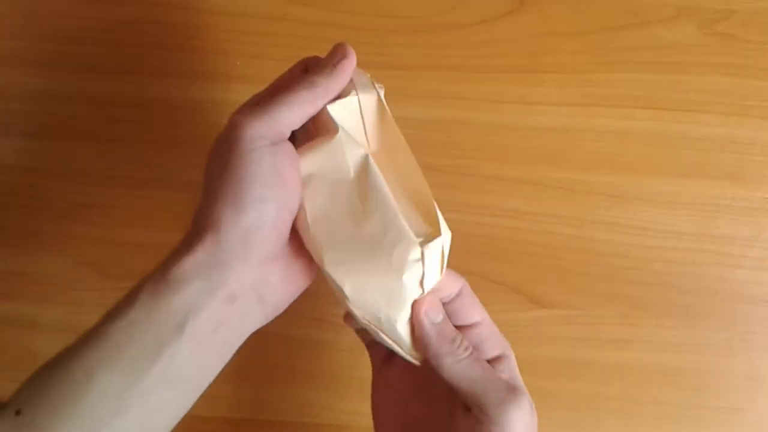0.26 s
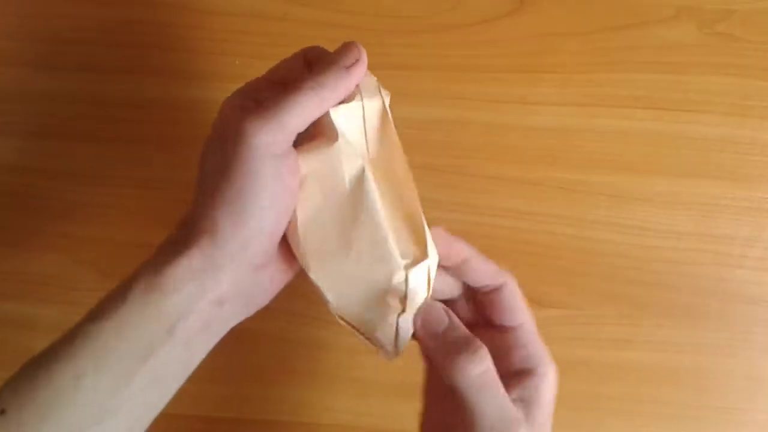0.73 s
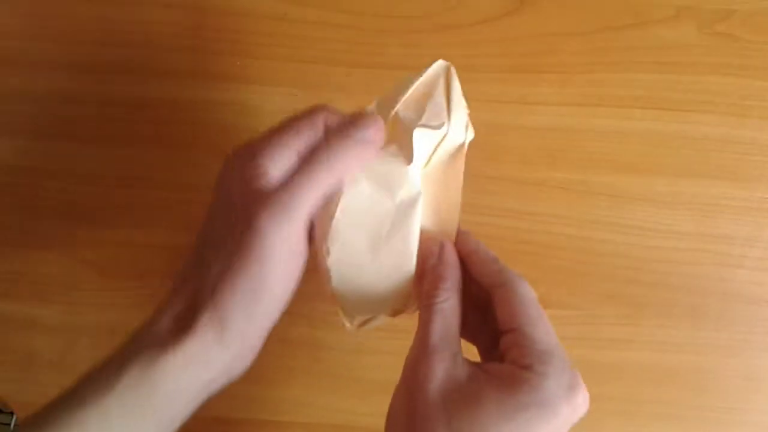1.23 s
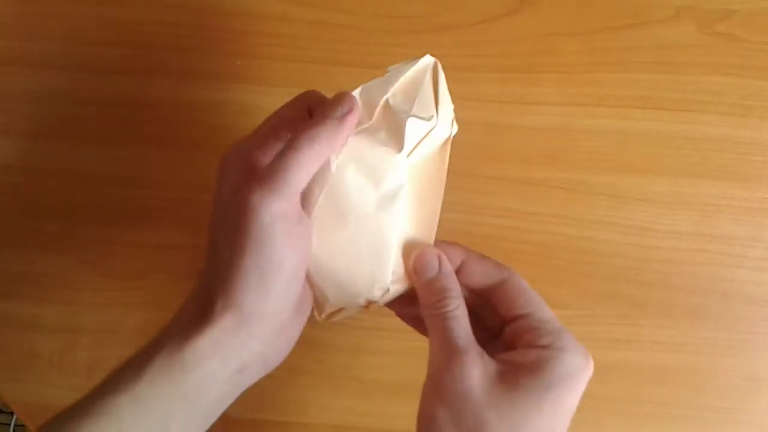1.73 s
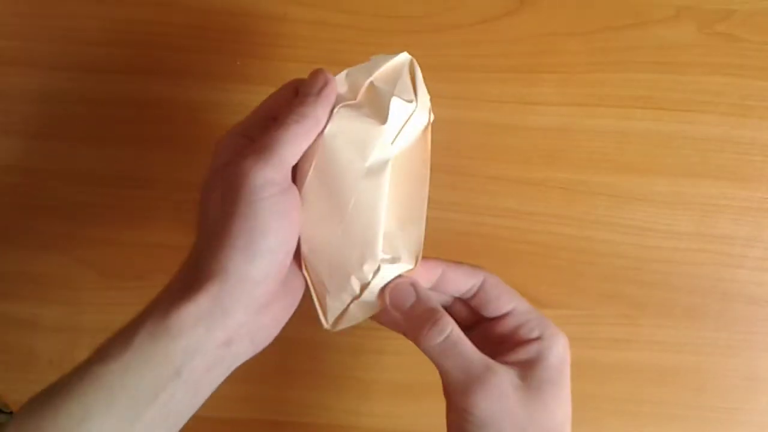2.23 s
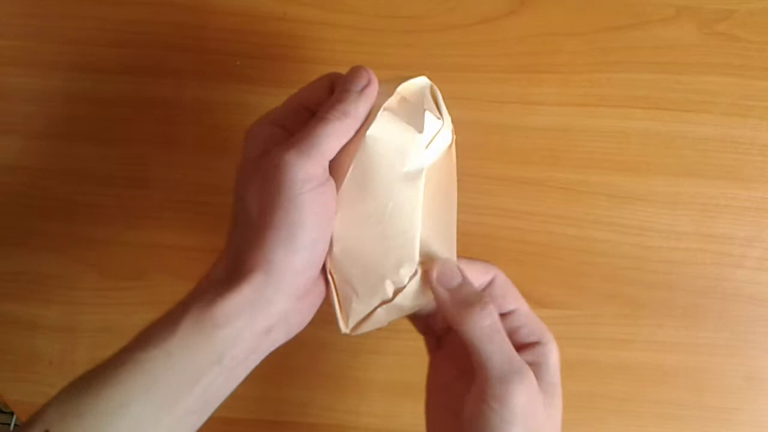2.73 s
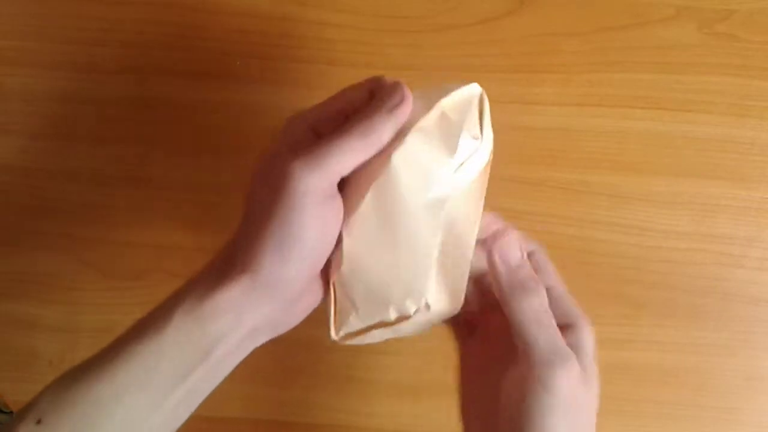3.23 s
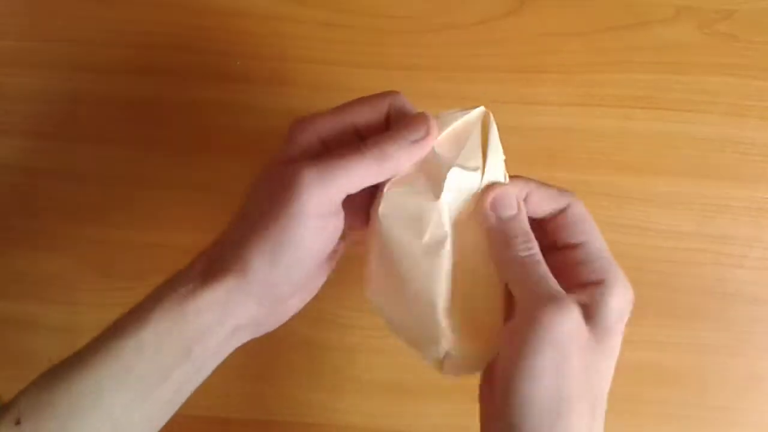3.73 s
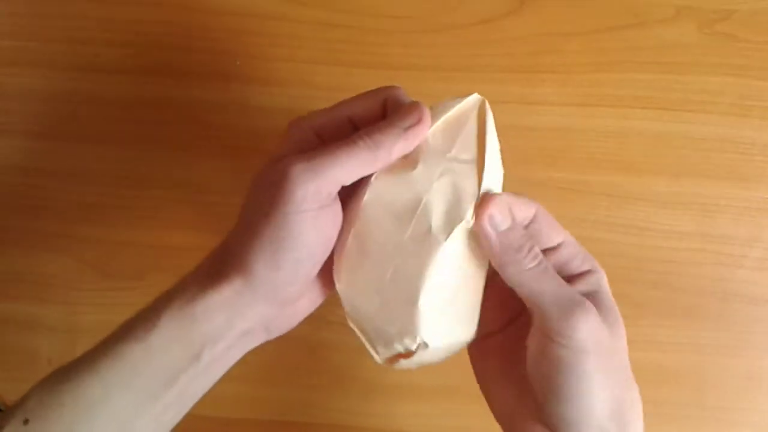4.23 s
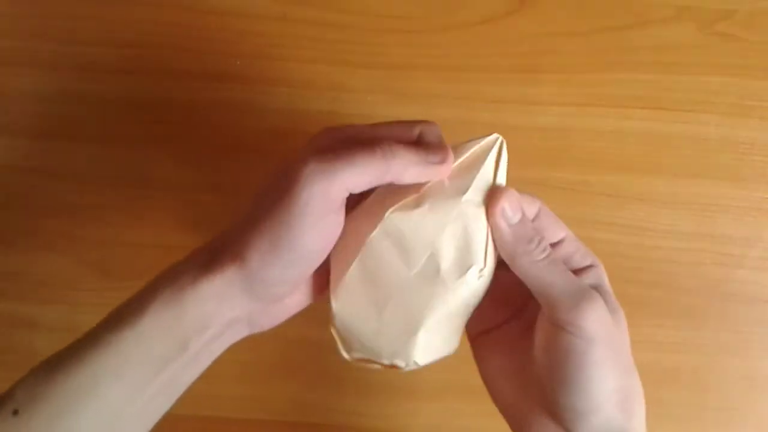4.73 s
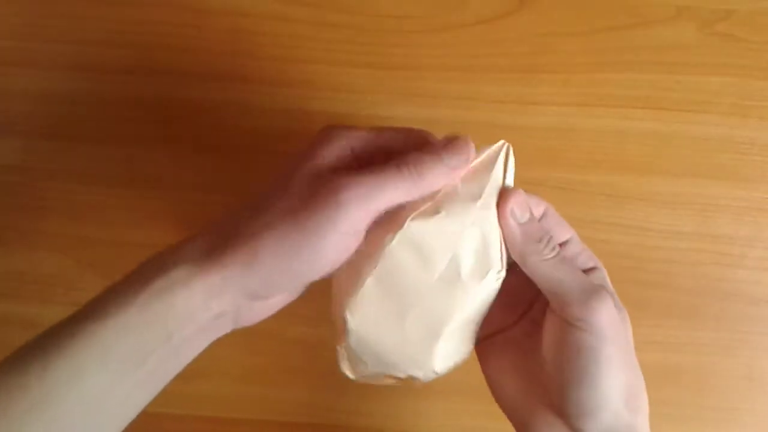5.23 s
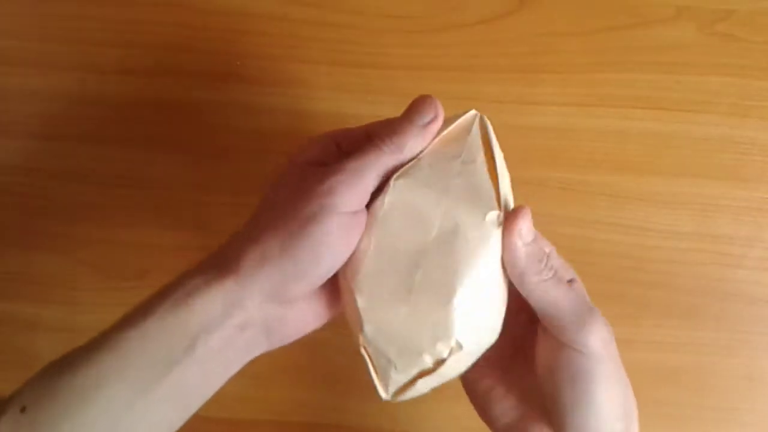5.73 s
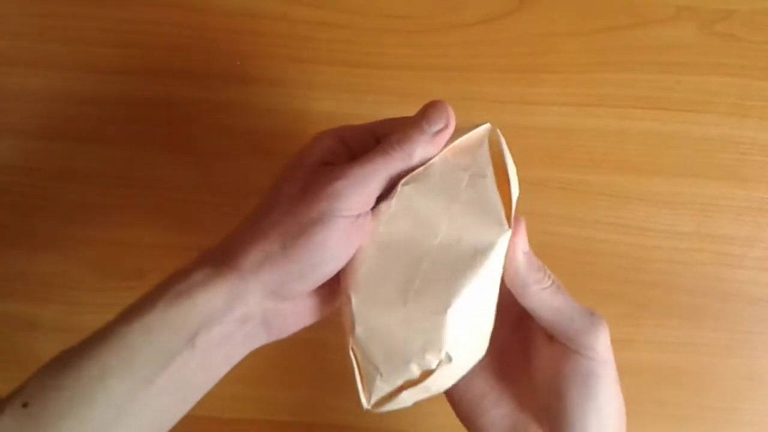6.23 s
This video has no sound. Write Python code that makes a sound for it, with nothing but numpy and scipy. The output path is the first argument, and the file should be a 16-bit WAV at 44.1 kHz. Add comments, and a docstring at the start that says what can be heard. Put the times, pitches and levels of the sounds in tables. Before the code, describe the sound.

Stiff paper crinkles and snaps unevenly between fingers, with soft scratchy rubbing between flurries and two loud pops near the end, close up indoors.

```python
"""Two hands press open a folded paper pouch above a wooden desk in a small quiet room with a mains hum.
From the start, creases buckle with sharp snaps that briefly ring the hollow pouch, a loose flap and a facet;
between them fingers rub as stick-slip friction noise, and small wrinkles tick as the grip shifts.
After 4.1 s the pouch is open and the flap rings higher; a loud snap near 6.0 s and another near 6.4 s,
followed by a last rub, end the scene. Filtered noise makes cracks, rubs and air; decaying sines make rings."""
import sys
import numpy as np
from scipy import signal
from scipy.fft import rfft, irfft
from scipy.io import wavfile

SR = 44100
rng = np.random.default_rng(int(sys.argv[2]) if len(sys.argv) > 2 else 0)


def master_out(mix):
    """Clip the mix to full scale and print it as 16-bit PCM to the path in sys.argv[1]."""
    frames = np.transpose(np.atleast_2d(mix))
    ceiling = np.clip(frames, -1, 1)
    pcm = np.round(ceiling * 32767).astype(np.int16)
    wavfile.write(sys.argv[1], SR, pcm)


N = 285768
TIME = np.arange(N) / SR
SHORT_TIME = np.arange(4096) / SR  # time axis of one crack or ring
HALF_SECOND = TIME[:SR // 2]

# Spectrum of the still room, relative density: frequency_hz, density_db
AIR_SPECTRUM = [(25, -13), (54, -7), (90, -4.5), (125, -3), (165, -2), (260, -3.5), (450, -8.5), (800, -13),
                (1400, -16), (2500, -44), (5000, -27), (8000, -24.5), (15000, -24.5)]
# Spectrum of paper sliding on skin and on itself, relative: frequency_hz, gain_db
FRICTION_SPECTRUM = [(180, -21.5), (330, 3), (560, -7.5), (800, -5), (1060, -5), (1500, -6.5), (2000, 1),
                     (2900, -4.5), (4300, -1.5), (5500, -5.5), (7500, -13), (10500, -17.5), (15000, -21)]
# Effort of the shifting grip, the base level of its rustle: time_s, effort_db
GRIP_EFFORT = [(0.0, -66), (0.78, -66.5), (1.37, -62.5), (1.51, -57.5), (1.97, -69), (2.04, -62.5),
               (2.38, -58.5), (3.27, -64), (3.52, -64), (3.61, -61.5), (4.58, -62), (5.02, -65.5),
               (5.32, -65.5), (5.67, -58), (5.79, -64), (6.1, -56.5), (6.39, -66), (6.48, -64)]
# Clear strokes of a finger or a sliding layer: middle_s, swell_width_s, level_db
RUB_STROKES = [(0.024, 0.019, -42), (0.254, 0.026, -57.5), (0.624, .022, -51), (0.718, .018, -52.5),
               (1.059, 0.029, -46), (1.132, 0.02, -44.5), (1.523, 0.059, -53), (1.706, 0.029, -50),
               (1.961, 0.026, -46.5), (2.15, .07, -56), (2.307, 0.023, -54), (2.428, 0.016, -45.5),
               (3.162, 0.021, -53.5), (3.528, 0.023, -50.5), (3.683, 0.022, -53), (4.569, 0.016, -43.5),
               (4.801, 0.021, -53), (5.572, 0.032, -45), (6.259, 0.03, -46.5), (6.453, .032, -39)]
# Wrinkles that stand out in the lulls: start_s, level_db
CLEAR_TICKS = [(3.144, -53.5), (3.225, -51.5), (3.266, -51.5), (3.677, -50), (3.995, -54.5), (4.295, -54.5),
               (4.714, -49), (4.728, -52), (4.922, -54.5), (5.213, -51.5), (5.316, -50), (5.344, -50)]
# Radiation of the cracking sheet, relative: frequency_hz, gain_db
SHEET_SPECTRUM = [(150.0, -33), (300.0, -1.5), (500.0, -2.5), (800.0, -4.5), (1400.0, -4), (1900.0, 4.5),
                  (2800.0, -1), (4000.0, 1.5), (5200.0, -2), (6500.0, -12), (8500.0, -20), (11000.0, -28.5),
                  (15000.0, -38)]
# Creases snapping through: start_s, crack_db, tilt_db_per_octave, pouch_hz, pouch_db, flap_db, facet_hz
CREASE_SNAPS = [(0.125, -49.5, 5, 390, -58, -63, 1910), (0.3083, -34, 2, 340, -43.5, -55, 1904),
                (0.3232, -34.5, 3.5, 410, -44.5, -64, 1525), (0.328, -33.5, 0.5, 310, -47.5, -58, 1890),
                (0.587, -39.5, -4, 354, -48, -66, 1850), (0.6551, -42, -5, 416, -35, -57, 690),
                (0.69, -48, 5.5, 400, -59, -67, 3940), (.9751, -44, -2, 334, -57, -55.5, 1850),
                (1.3228, -41, 0.5, 325, -58, -51, 2170), (1.375, -42, -4, 485, -47, -55, 2290),
                (1.3806, -29.5, -0.7, 684, -60, -39, 2280), (1.4005, -19, 3.5, 434, -31, -33, 2300),
                (1.587, -60, -10, 443, -53, -71, 640), (1.8405, -31.5, -1, 420, -37, -37, 800),
                (1.9053, -32.5, -1, 684, -59, -46, 1860), (1.9468, -34, 3.5, 367, -62, -54, 2130),
                (2.1136, -49.5, 2, 467, -52.5, -60, 1830), (2.352, -31.5, 2, 694, -48, -39.5, 2120),
                (2.43, -41.5, 3, 370, -45.5, -52, 1950), (2.5165, -46.5, -2, 357, -64, -60, 2200),
                (2.5557, -45.5, -0.5, 328, -51, -48, 1090), (2.71, -42.5, -0.5, 590, -56, -53, 2000),
                (2.7909, -34.5, -2.5, 536, -40, -60, 2220), (2.8722, -35.5, -5, 447, -33, -52, 784),
                (2.9442, -22, 3.5, 490, -33, -33, 3750), (2.9596, -32, 3.5, 494, -36, -58, 5100),
                (3.3842, -47.5, 0.5, 413, -52.5, -58, 2690), (3.462, -43.5, 1, 380, -55.5, -52.5, 4110),
                (3.757, -47.5, -6.5, 710, -52, -58, 1890), (3.78, -34.5, -2.5, 715, -62, -44.5, 1890),
                (3.8314, -33.5, -6, 515, -30, -31.5, 945), (3.95, -54.5, -7.5, 370, -47.5, -61, 784),
                (4.0777, -49, 2.5, 470, -48.5, -67, 3500), (4.1229, -47.5, 3, 450, -57, -64, 2330),
                (4.226, -40.5, 0.5, 514, -52, -62, 2570), (4.39, -30, -1, 358, -38.5, -38.5, 2400),
                (4.4098, -36, -3, 340, -60, -52, 764), (4.559, -46, 0, 370, -49, -52, 2380),
                (4.609, -43, -2.2, 377, -54, -58, 1820), (5.4497, -31.5, -4.5, 309, -33, -56, 1995),
                (5.4943, -36.5, 5, 524, -49.5, -47, 2000), (5.562, -38, 2.5, 580, -63, -47, 1830),
                (5.584, -45, -4, 587, -49, -49, 2200), (5.607, -56, -8, 368, -50.5, -64, 694),
                (5.7119, -39.5, -6.5, 343, -33.5, -53, 2190), (5.7758, -40.5, -7, 440, -49, -58, 935),
                (5.7931, -32.5, 0, 490, -43, -42, 4200), (5.8135, -39, -8, 376, -41.5, -62, 1810),
                (5.844, -33.5, -2.5, 259, -45, -60, 2290), (5.8626, -48.5, -10, 530, -47, -60, 740),
                (5.958, -46.5, -9, 520, -43.5, -66, 740), (5.998, -18.5, 2, 260, -35, -40, 4070),
                (6.1517, -60, -5, 396, -48.5, -68, 2100), (6.1734, -36, -3.5, 302, -45, -38, 1855),
                (6.2693, -35, -2.5, 743, -43.5, -56, 1930), (6.408, -18, 3, 744, -33.5, -41, 1860)]

AIR_DB, HUM_DB, MAINS_HZ = -60, -68, 120
WRINKLES_PER_S, WRINKLE_SPREAD_DB = 22, 3.5  # faint wrinkles: mean rate, spread either side of the grip effort
FLAP_LOOSE_HZ, FLAP_TAUT_HZ, OPENS_S = 1024, 1435, 4.1  # an opened pouch pulls the flap taut
FLAP_SPREAD = 0.079  # share by which the flap's pitch differs from fold to fold
FACET_DB = -4  # facet ring relative to an untilted crack
RING_PER_TILT = 0.22  # facet dB gained per dB per octave of dullness: a slow buckle moves the whole facet
TOP_HZ = 15000


def undb(db):
    """Amplitude gain is ten to the power of decibels over twenty."""
    return 10 ** (np.asarray(db) / 20)


def level(x, db):
    """The root mean square sets the level of a sustained sound."""
    return x * undb(db) / np.sqrt(np.mean(x ** 2))


def burst_level(x, db):
    """The level of a short sound is its total energy spread over 10 ms."""
    return x * undb(db) / np.sqrt(np.sum(x ** 2) / (SR / 100))


def add(out, x, start_s):
    """Superposition: sounds add sample by sample from their start onwards."""
    i = int(np.clip(start_s * SR, 0, N - 1))
    out[i:i + len(x)] += x[:N - i]


def fade(t, t60):
    """Exponential decay falls by 60 dB in t60 seconds."""
    return np.exp(-np.log(1000) * t / t60)


def low_pass(x, order, hz):
    """A Butterworth filter attenuates components above its corner frequency."""
    return signal.sosfilt(signal.butter(order, hz, fs=SR, output="sos"), x)


def high_pass(x, order, hz):
    """A Butterworth filter attenuates components below its corner frequency."""
    return signal.sosfilt(signal.butter(order, hz, "high", fs=SR, output="sos"), x)


def colour(x, points, tilt_db=0, size=4096):
    """A minimum-phase filter realises a magnitude curve causally; the tilt is in dB per octave."""
    hz, db = np.transpose(points)
    f = np.maximum(np.arange(size // 2 + 1) * SR / size, 1)
    # the tilt pivots at 3000 Hz and levels off below 450 Hz
    tilt = tilt_db * np.log2(np.maximum(f, 450) / 3000)
    gain_db = np.interp(np.log(f), np.log(hz), db) + tilt
    # folding the cepstrum onto positive times gives minimum phase
    cepstrum = irfft(np.log(undb(gain_db)))
    cepstrum[1:size // 2] *= 2
    cepstrum[size // 2 + 1:] = 0
    impulse_response = irfft(np.exp(rfft(cepstrum)))
    return signal.fftconvolve(x, impulse_response)[:len(x)]


def walk(hz):
    """Low-passed noise is a slow random drift; its spread is 1."""
    return level(low_pass(rng.standard_normal(N), 2, hz), 0)


def still_air(waver=0.2, waver_hz=6):
    """Ambient noise is a steady coloured hiss and rumble; the mains adds a slightly wavering sine hum."""
    air = level(colour(rng.standard_normal(N), AIR_SPECTRUM), AIR_DB)
    hum = (1 + waver * walk(waver_hz)) * np.sin(2 * np.pi * MAINS_HZ * TIME)
    return air + level(hum, HUM_DB)


def room(x, wet_db=-10.0, t60=0.18, treble_t60=0.15, split_hz=6000, build_s=0.0035, bass_db=2):
    """Reverberation of a small furnished room builds up quickly and decays faster in the treble."""
    t = HALF_SECOND
    low = low_pass(rng.standard_normal(len(t)), 2, split_hz)
    high = high_pass(rng.standard_normal(len(t)), 2, split_hz)
    build_up = 1 - np.exp(-(t / build_s) ** 2)
    tail = (low * fade(t, t60) + high * fade(t, treble_t60)) * build_up
    unit_energy_tail = tail / np.sqrt(np.sum(tail ** 2))
    echoes = colour(unit_energy_tail, [(700, bass_db), (2500, 0)])
    return undb(wet_db) * signal.fftconvolve(x, echoes)[:N]


def folded(points, ripple_db):
    """Each shape of the fold superposes its own treble peaks and gaps on the paper's spectrum."""
    hz = np.geomspace(150, 15000, 72)
    # the ripple reaches its full spread at 2000 Hz
    ripple = ripple_db * rng.standard_normal(len(hz)) * np.clip(hz / 2000, 0, 1)
    known_hz, db = np.transpose(points)
    smooth_db = np.interp(np.log(hz), np.log(known_hz), db)
    return np.column_stack([hz, smooth_db + ripple])


def friction(samples, catches_per_s=900, scatter_db=5.0, slide=0.93):
    """Stick-slip: fibres catch and let go in dense tiny ticks above a steady slide; rms 1."""
    sizes = undb(scatter_db * np.minimum(rng.exponential(size=samples), 4.5))
    catches = (rng.random(samples) < catches_per_s / SR) * sizes
    tick_decay = fade(SHORT_TIME, 0.012)
    energy = np.abs(signal.fftconvolve(catches ** 2, tick_decay ** 2)[:samples])
    grain = np.sqrt(energy / energy.mean() + slide)
    noise = grain * rng.standard_normal(samples)
    return level(colour(noise, folded(FRICTION_SPECTRUM, 2.8)), 0)


def effort_db(s):
    """The grip's effort on the paper varies continuously between tabulated times."""
    return np.interp(s, *np.transpose(GRIP_EFFORT))


def rubs(grip_db=-2.0, pressure_db=2.0, pressure_hz=16):
    """Sliding friction: strokes swell and die over a grip that keeps shifting to a new fold."""
    strokes, grip = np.zeros((2, N))
    t = HALF_SECOND
    for middle_s, width_s, db in RUB_STROKES:
        start_s = max(middle_s - t[-1] / 2, 0)
        swell = np.exp(-((t + start_s - middle_s) / width_s) ** 2)
        add(strokes, undb(db) * swell * friction(len(t)), start_s)
    # overlapping half-sine windows pass from one fold to the next
    for start_s in np.arange(0, N / SR, t[-1] / 2):
        add(grip, np.sin(np.pi * t / t[-1]) * friction(len(t)), start_s)
    # the fingers never press evenly
    uneven_db = pressure_db * walk(pressure_hz)
    return strokes + grip * undb(effort_db(TIME) + grip_db + uneven_db)


def ticks(tilt_db=-2.5):
    """Wrinkles too small to shake the pouch only crack; faint ones fall at random and follow the grip."""
    out = np.zeros(N)
    when, size = rng.random((int(WRINKLES_PER_S * N / SR), 2)).T
    times = when * N / SR
    faint_db = effort_db(times) + WRINKLE_SPREAD_DB * (2 * size - 1)
    for start_s, db in [*CLEAR_TICKS, *zip(times, faint_db)]:
        add(out, burst_level(crack(tilt_db, hold_s=0.006), db), start_s)
    return out


def crack(tilt_db, hold_s=0.0043, flutter_db=-23, flutter_t60=0.11, edge_hz=14000, db_per_octave=3.5):
    """Bending waves run to and fro in the sheet: an abrupt dense burst, then a weak flutter."""
    burst = fade(np.maximum(SHORT_TIME - hold_s, 0), 0.028)
    envelope = burst + undb(flutter_db) * fade(SHORT_TIME, flutter_t60)
    waves = rfft(rng.standard_normal(len(SHORT_TIME)) * envelope)
    # sudden buckling excites all frequencies about equally; a second, gentler envelope shapes the result
    even = irfft(waves / np.abs(waves)) * np.sqrt(envelope)
    # a dull, slow buckle also loses its sharp edge
    edge = np.clip(edge_hz * 2 ** (tilt_db / db_per_octave), 3500, 19000)
    return colour(low_pass(even, 3, edge), folded(SHEET_SPECTRUM, 4), tilt_db)


def ring(hz, swell_s=0.002, shorten=0.08, rough=0.41):
    """A damped paper panel swells within milliseconds and dies at once; high panels are quicker."""
    tau = swell_s * (1000 / hz) ** shorten  # swell_s holds for a 1000 Hz panel
    # the panel is still changing shape, so its pitch is unsteady
    wander = rough * np.cumsum(rng.standard_normal(len(SHORT_TIME))) / np.sqrt(tau * SR)
    phase = 2 * np.pi * (hz * SHORT_TIME + rng.random()) + wander
    return SHORT_TIME * np.exp(-SHORT_TIME / tau) * np.sin(phase)


def snaps():
    """Snap-through buckling cracks each crease and excites pouch, flap and facet; returns both sounds."""
    cracks, rings = np.zeros((2, N))
    for start_s, crack_db, tilt_db, pouch_hz, pouch_db, flap_db, facet_hz in CREASE_SNAPS:
        add(cracks, burst_level(crack(tilt_db), crack_db), start_s)
        flap_base_hz = FLAP_LOOSE_HZ if start_s < OPENS_S else FLAP_TAUT_HZ
        flap_hz = flap_base_hz * (1 + FLAP_SPREAD * rng.uniform(-0.91, 1))
        facet_db = crack_db + FACET_DB - RING_PER_TILT * tilt_db
        for hz, db in (pouch_hz, pouch_db), (flap_hz, flap_db), (facet_hz, facet_db):
            add(rings, burst_level(ring(hz), db), start_s)
    return cracks, rings


def scene(small_sheet_hz=245, ring_spill_db=-5):
    """Direct and reverberant paper sound superpose on the still air."""
    cracks, rings = snaps()
    crackle = cracks + rubs() + ticks()
    # the flat panels face the microphone, so less of their ring reaches the walls
    to_walls = crackle + undb(ring_spill_db) * rings
    paper = crackle + rings + room(to_walls)
    # so small a sheet radiates almost no bass
    paper = high_pass(paper, 3, small_sheet_hz)
    return (paper + still_air())[None]


def record(dry):
    """Band limiting: the recorder's steep elliptic low-pass cuts the top."""
    return signal.sosfilt(signal.ellip(10, 0.1, 70, TOP_HZ, fs=SR, output="sos"), dry)


dry = scene()
out = record(dry)
master_out(out)
```